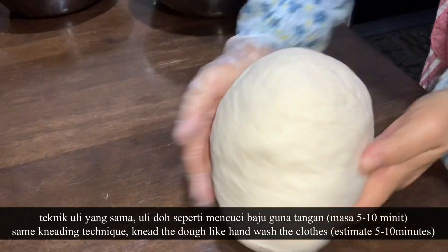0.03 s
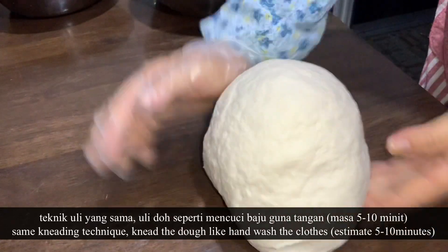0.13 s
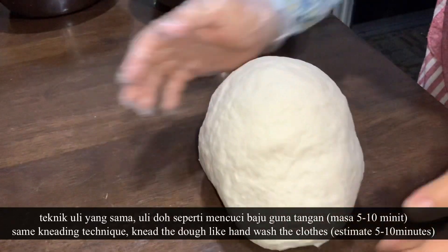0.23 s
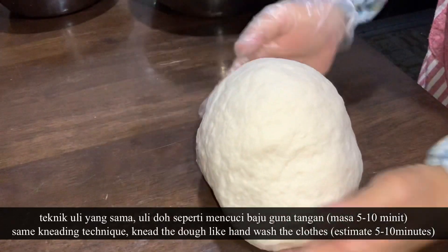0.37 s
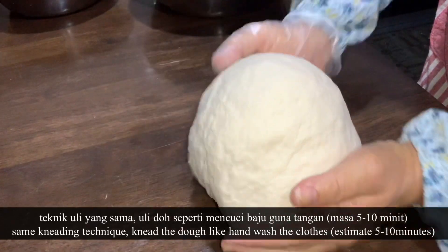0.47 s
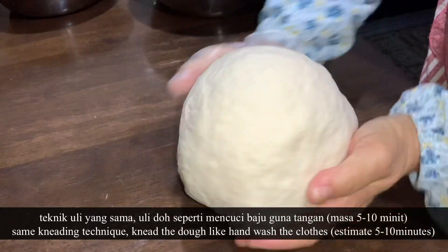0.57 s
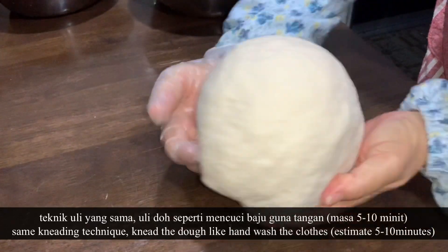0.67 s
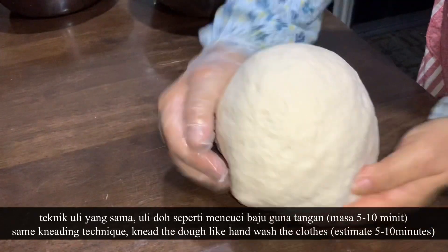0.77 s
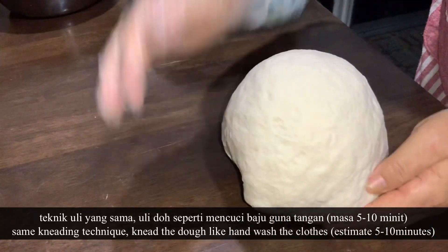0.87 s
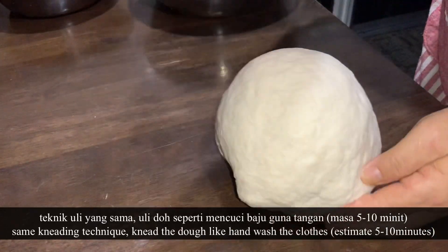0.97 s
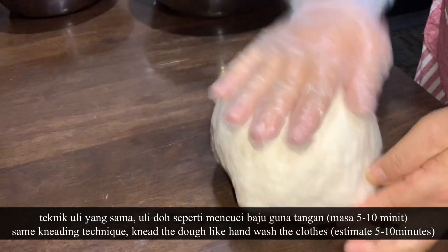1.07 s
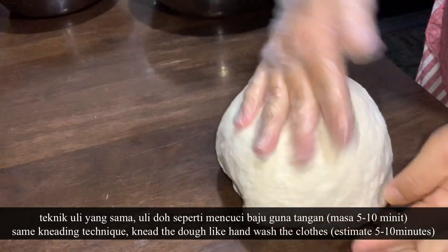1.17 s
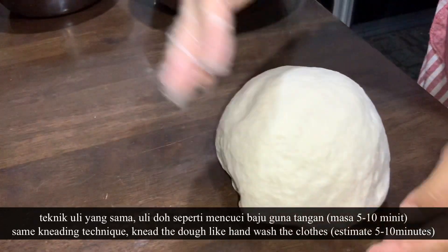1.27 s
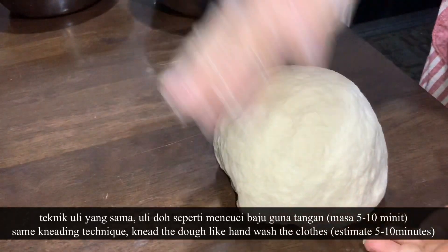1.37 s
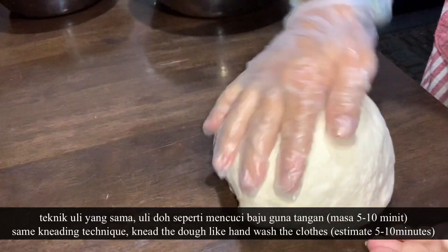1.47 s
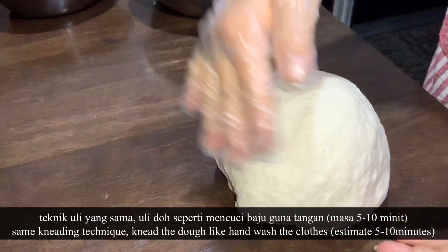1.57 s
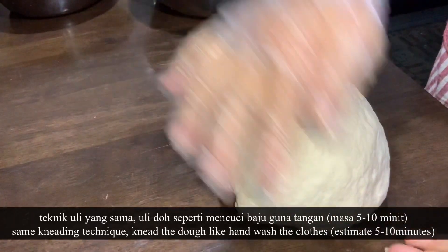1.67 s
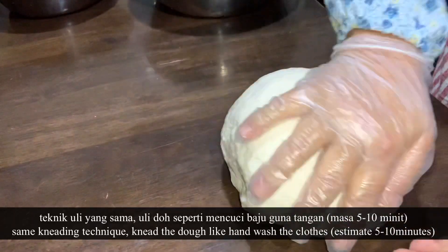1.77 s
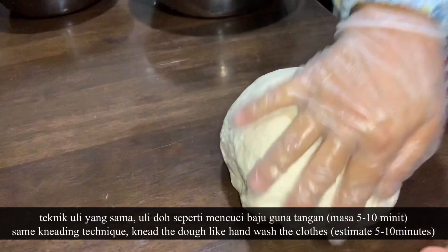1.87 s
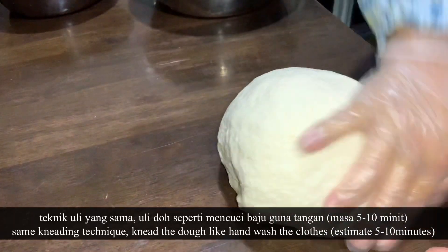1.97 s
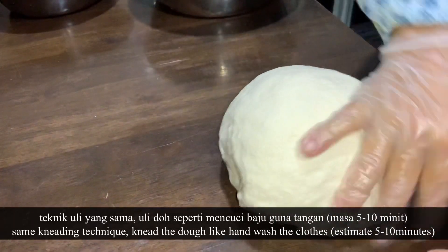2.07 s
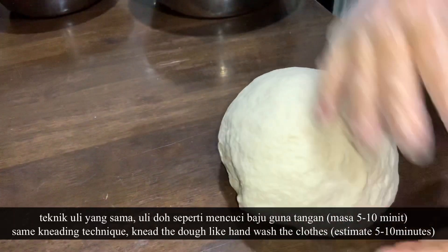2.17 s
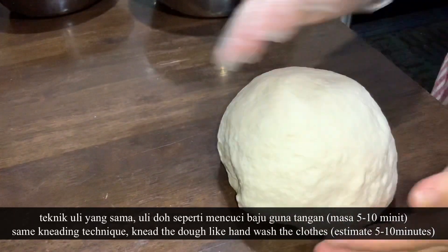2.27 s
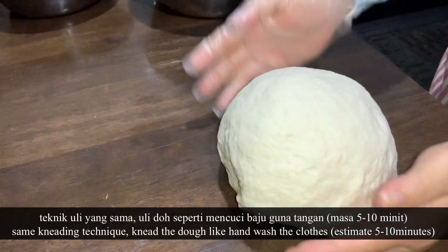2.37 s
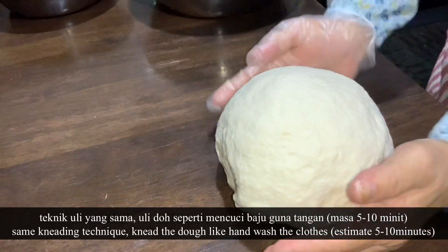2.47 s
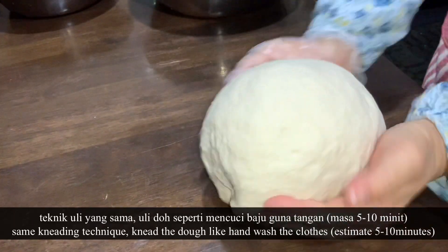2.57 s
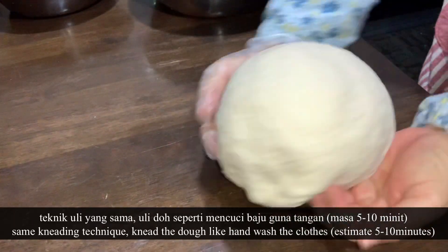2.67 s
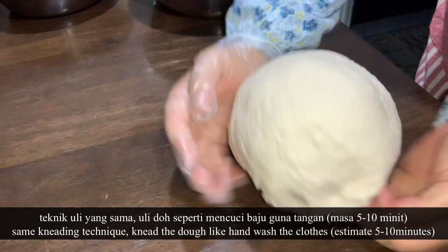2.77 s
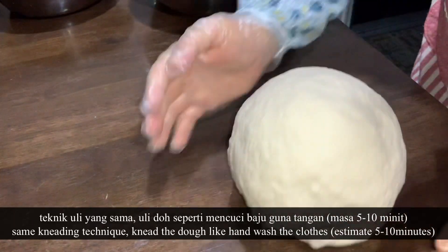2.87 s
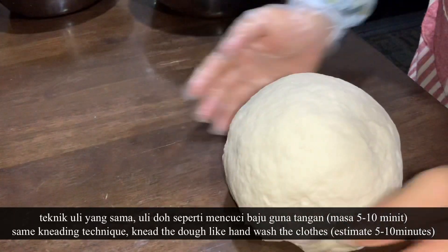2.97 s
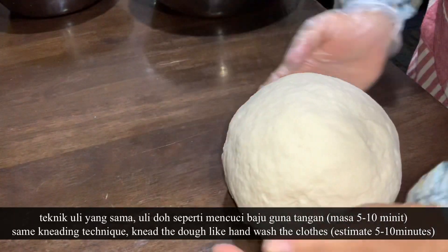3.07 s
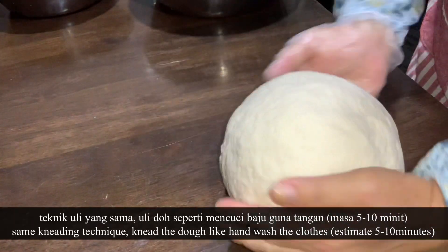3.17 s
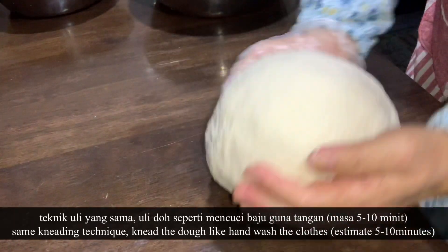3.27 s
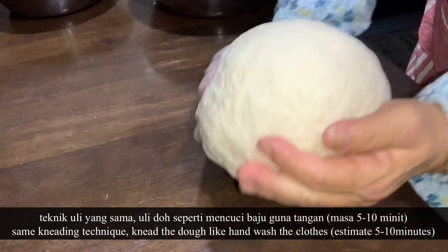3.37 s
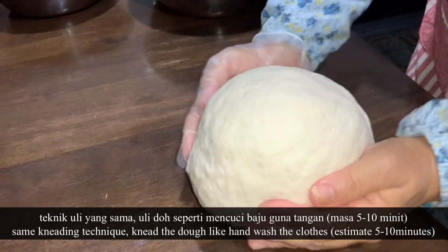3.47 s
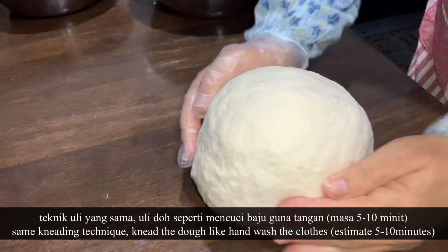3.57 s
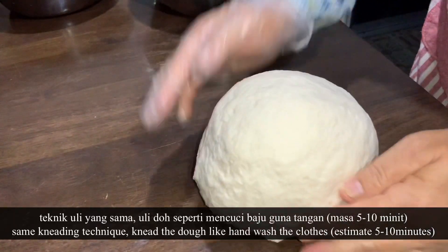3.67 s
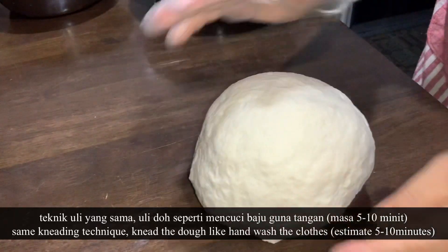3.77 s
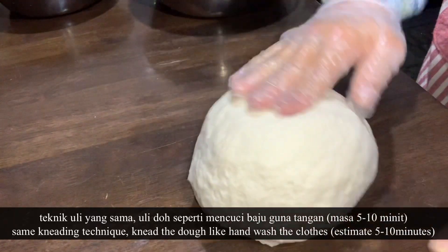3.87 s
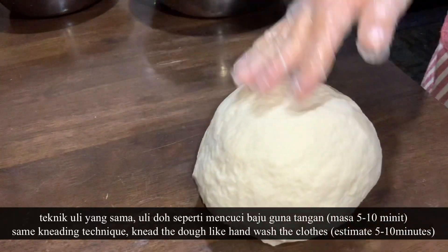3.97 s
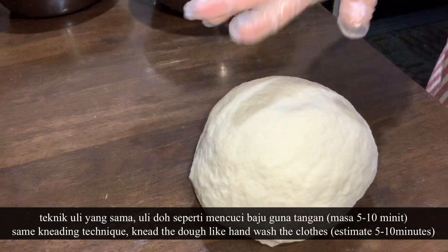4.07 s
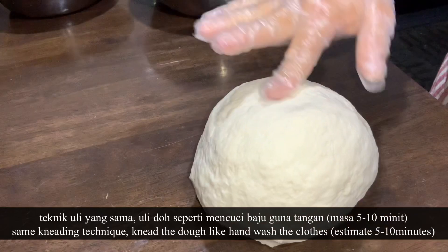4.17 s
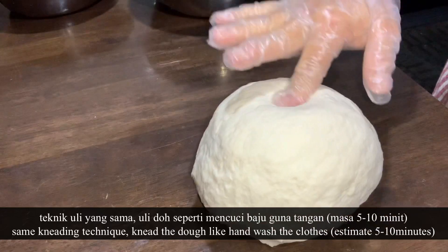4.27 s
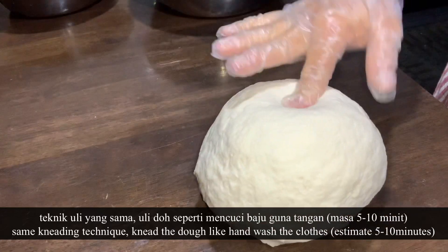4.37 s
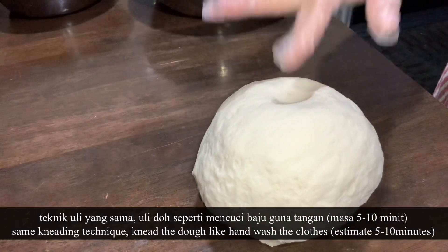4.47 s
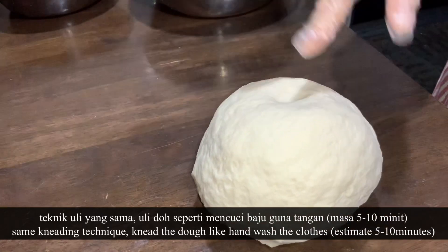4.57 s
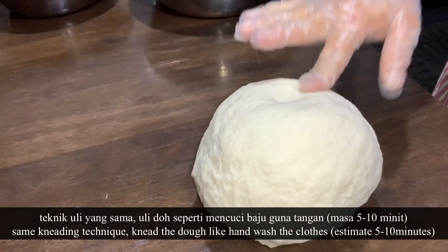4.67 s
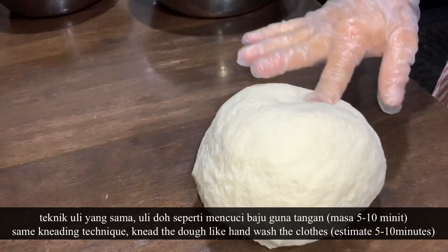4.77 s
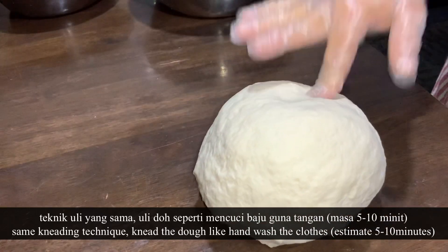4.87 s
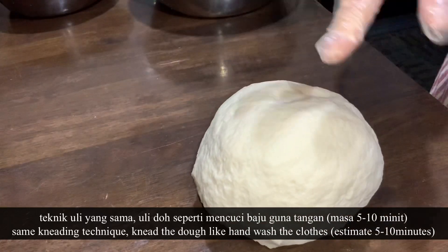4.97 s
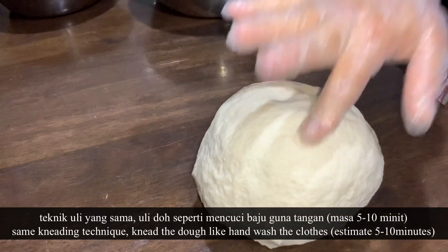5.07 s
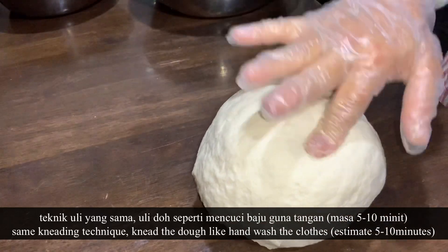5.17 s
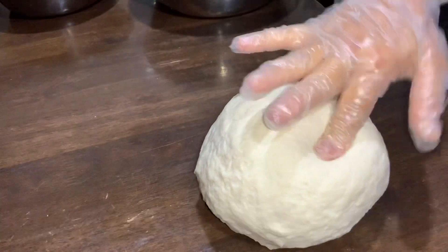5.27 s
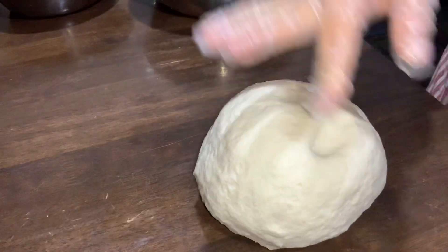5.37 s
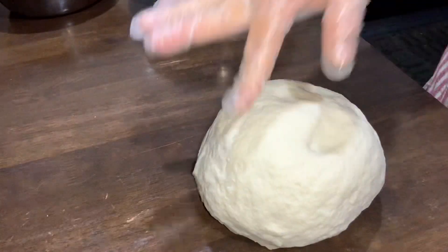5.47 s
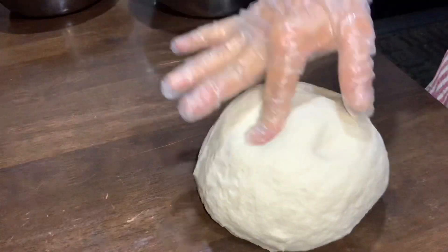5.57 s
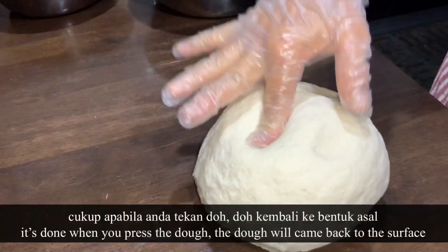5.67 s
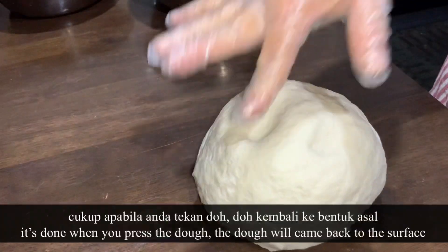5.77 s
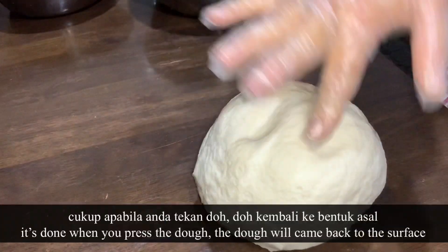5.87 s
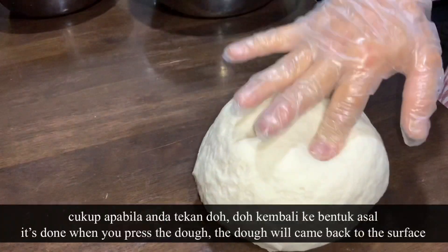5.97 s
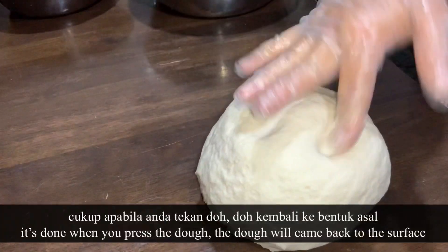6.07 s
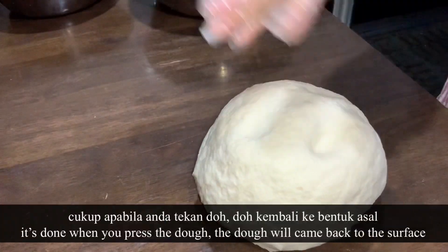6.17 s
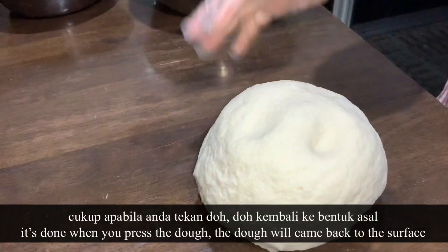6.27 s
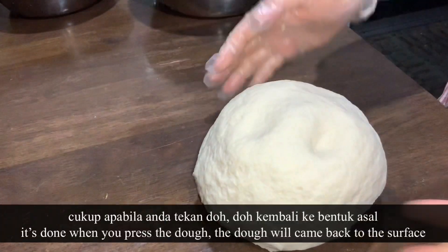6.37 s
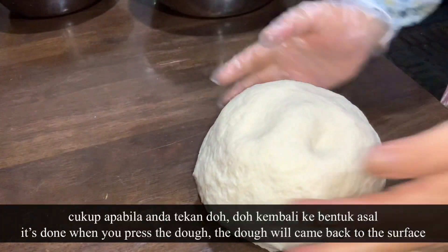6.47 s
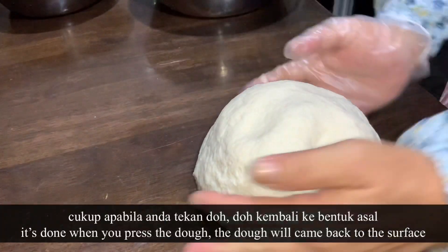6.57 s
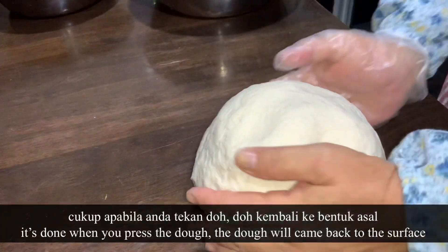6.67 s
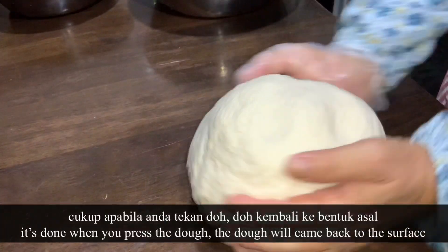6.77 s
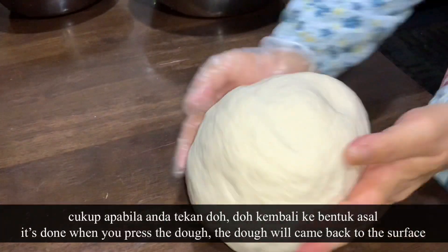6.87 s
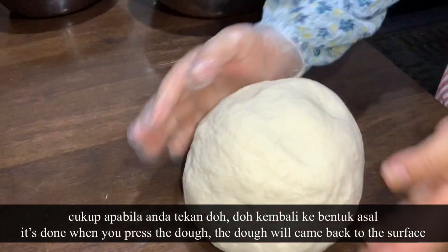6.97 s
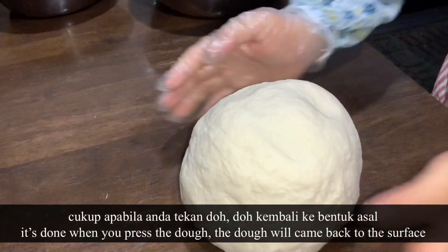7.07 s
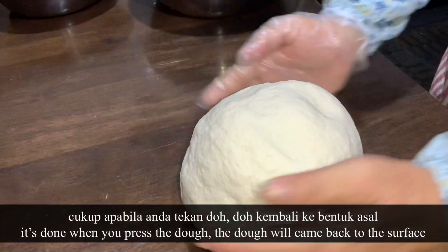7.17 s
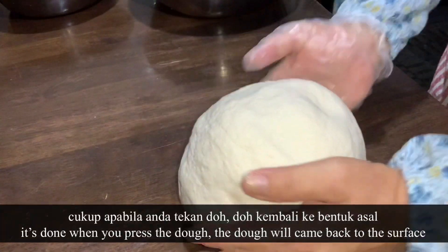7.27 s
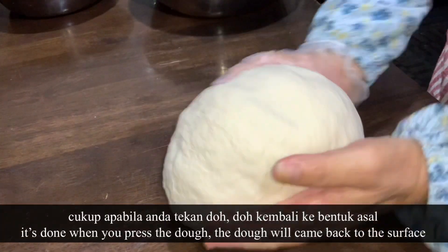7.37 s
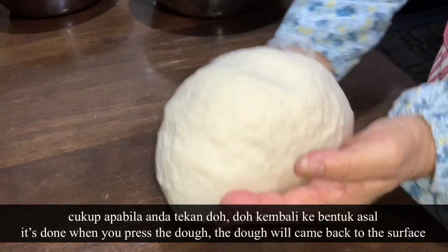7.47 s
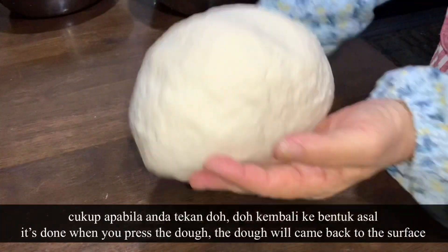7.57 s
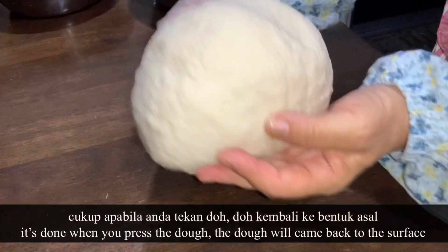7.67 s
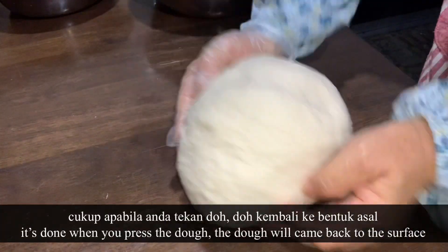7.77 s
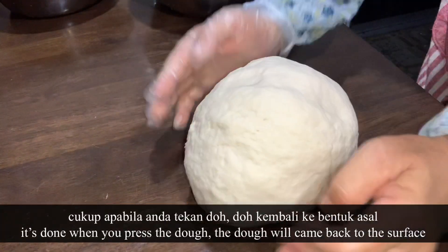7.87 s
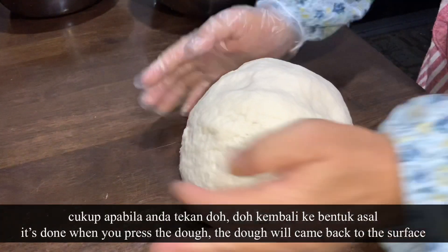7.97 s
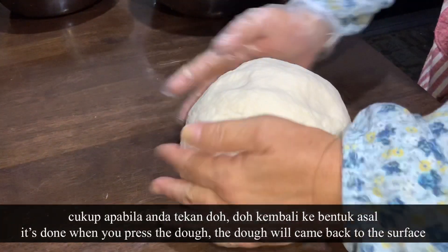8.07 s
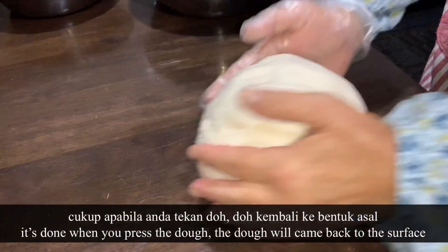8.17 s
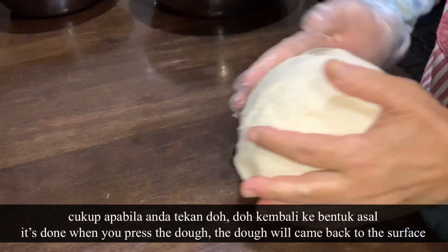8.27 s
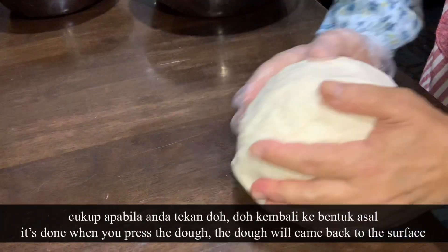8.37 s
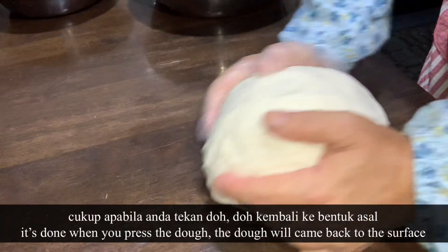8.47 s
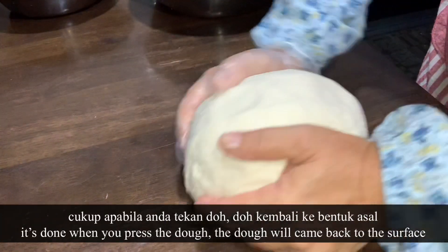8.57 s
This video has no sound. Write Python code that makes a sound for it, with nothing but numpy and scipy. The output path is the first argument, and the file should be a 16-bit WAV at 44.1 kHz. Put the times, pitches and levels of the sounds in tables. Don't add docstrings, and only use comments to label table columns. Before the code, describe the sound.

A plastic-gloved hand crinkles and turns dough, slaps it hard several times, then pokes it softly on a wooden table over low appliance rumble.

```python
import sys
import numpy as np
from scipy import signal
from scipy.fft import rfft, irfft, next_fast_len
from scipy.io import wavfile
from scipy.ndimage import uniform_filter1d, map_coordinates

SR = 44100
rng = np.random.default_rng(int(sys.argv[2]) if len(sys.argv) > 2 else 0)


def dump_mix(stems):
    frames = np.atleast_2d(stems).T
    limited = np.clip(frames, -1, 1)
    pcm = np.round(limited * 32767).astype(np.int16)
    wavfile.write(sys.argv[1], SR, pcm)


def linear_from_db(decibels):
    return 10 ** (np.asarray(decibels, float) / 20)


N = 380141


def unit(x):
    return x / np.sqrt(np.mean(x ** 2) + 1e-20)


def along(points, hz):
    f, v = np.transpose(points)
    return np.interp(np.log(hz + 1), np.log(f + 1), v)


def wobble(rate):
    knots = rng.standard_normal(int(N * rate / SR) + 4)
    return map_coordinates(knots, [np.arange(N) * rate / SR])


def filtered(x, response):
    m = next_fast_len(N + SR // 2)
    hz = np.fft.rfftfreq(m, 1 / SR)
    return irfft(rfft(x, m) * response(hz), m)[..., :N]


def shaped(x, spectrum):
    return filtered(x, lambda hz: linear_from_db(along(spectrum, hz)))


def hushed(spectrum):
    return unit(shaped(rng.standard_normal((2, N)), spectrum))


def resonant(x, hz, q):
    return signal.lfilter(*signal.iirpeak(hz, q, SR), x)


def add(track, s, sound):
    track[:, round(s * SR):][:, :sound.shape[1]] += sound


def burst(db, t60, rise_s, hold_s, size=SR // 16):
    t = np.arange(size) / SR
    decay = linear_from_db(db - 60 * np.maximum(t - hold_s, 0) / t60)
    shape = decay * (1 - np.exp(-t / rise_s)) ** 2
    puff = shape * rng.standard_normal((2, size))
    return puff * np.linalg.norm(shape) / np.linalg.norm(puff, axis=1, keepdims=True)


# frequency in Hz, level in dB per Hz.
RUMBLE_SPECTRUM = [(12, -46.5), (20, -4), (65, -7), (98, 0.5), (124, 1.5), (178, -7), (242, -5.5),
                   (347, -13), (431, -14), (608, -17.5), (905, -20), (1500, -36.5), (1950, -65),
                   (3300, -120)]
# frequency in Hz, level in dB per Hz.
AIR_SPECTRUM = [(590, -30.5), (1000, -2.5), (2830, -16.5), (4330, -13), (6650, -16.5), (10500, -16.5),
                (14400, -10), (15800, -34.5)]
# frequency in Hz, level in dB per Hz.
HALO_SPECTRUM = [(1300, -60), (1600, -8), (1800, 0), (2050, -6), (2400, -60), (5100, -60), (5170, 4),
                 (5190, 4), (5260, -60)]
# time in seconds, level in dB.
WHINE_LEVEL = [
    (7.3, -95),
    (7.5, -70),
    (7.9, -65.5),
    (8.62, -66),
]


def background():
    rumble = linear_from_db(-48.5 + 0.63 * wobble(2.1)) * hushed(RUMBLE_SPECTRUM)
    air = linear_from_db(-64.0) * hushed(AIR_SPECTRUM)
    halo = linear_from_db(5) * hushed(HALO_SPECTRUM)
    pitch_hz = 1752 + 3 * wobble(5.5)
    line = linear_from_db(2 * wobble(8)) * np.sin(2 * np.pi * np.cumsum(pitch_hz) / SR)
    whine_db = np.interp(np.arange(N) / SR, *np.transpose(WHINE_LEVEL))
    return rumble + air + linear_from_db(whine_db) * (halo + line)


def crinkle(spectrum, per_s, spread_db, grain_db, flutter_db):
    happens = rng.random(N) < per_s / SR
    sizes = happens * linear_from_db(spread_db * np.minimum(rng.exponential(size=N), 2.5))
    snaps = unit(signal.lfilter([1], [1, -np.exp(-1 / (0.0029 * SR))], sizes))
    flutter = linear_from_db(flutter_db * (wobble(25) + wobble(70)))
    shape = (1 + linear_from_db(grain_db) * snaps) * flutter
    return unit(shaped(shape * rng.standard_normal((2, N)), spectrum))


def strokes(rows, fade):
    t = np.arange(0, N / SR, .002)
    s, swell, hold, db = np.transpose(rows)[:, :, None]
    climb_db = 20 * np.maximum(s - t, 0) / swell
    fade_db = fade * np.maximum(t - s - hold, 0)
    gain = np.linalg.norm(linear_from_db(db - climb_db - fade_db), axis=0)
    return np.interp(np.arange(N) / SR, t, gain)


def patchy(x, depth_db):
    z = signal.stft(x, nperseg=512)[2]
    luck = rng.standard_normal(z.shape[1:])
    field = uniform_filter1d(uniform_filter1d(luck, size=10, axis=0), size=6, axis=1)
    return signal.istft(z * linear_from_db(depth_db * unit(field)), nperseg=512)[1][:, :N]


# full strength in seconds, swell in seconds, hold in seconds,
# level in dB.
SLIDES = [(.1, 0.084, 0.027, -30), (.21, .01, 0.065, -44.5), (.34, 0.011, 0.17, -42.5),
          (.62, 0.061, 0.087, -42.5), (.71, 0.095, .04, -40.5), (.78, 0.058, 0.0038, -26.5),
          (.83, 0.018, 0.05, -38.5), (.95, .06, 0.2, -47.5), (1.09, .01, 0.15, -37),
          (1.5, 0.13, 0.058, -35), (1.88, 0.18, 0.015, -33.5), (2.02, .02, 0.13, -42.5),
          (2.37, 0.18, .01, -48), (2.43, 0.036, 0.36, -37.5), (2.492, 0.011, 0.028, -31.5),
          (2.928, .008, 0.18, -44), (3.17, 0.28, 0.081, -38), (3.45, 0.13, 0.04, -38.5),
          (3.63, 0.055, 0.017, -38.5), (3.945, 0.18, 0.026, -41), (6.15, .06, 0.11, -62),
          (6.48, 0.037, 0.2, -44.5), (6.72, 0.067, 0.13, -37), (6.95, 0.093, 0.032, -32),
          (7.108, 0.0088, 0.35, -40.5), (7.152, 0.016, 0.021, -38), (7.302, .006, .04, -41),
          (7.68, .08, .03, -55.5), (2.7, .03, .02, -36), (3.02, 0.053, .03, -43.5),
          (3.37, .006, 0.024, -38.5), (3.515, .006, .04, -41.5), (5.75, .012, .012, -41),
          (8.012, .01, 0.0086, -37.5), (7.76, 0.075, 0.071, -39), (7.995, 0.012, 0.18, -42.5),
          (8.45, 0.17, .2, -51.5)]
# full strength in seconds, swell in seconds,
# hold in seconds, crease level in dB, drag over crease in dB.
RUBS = [(0.048, 0.12, 0.081, -38.5, -2), (0.336, 0.017, 0.023, -36.5, -9), (0.64, 0.35, 0.11, -43, -5),
        (0.776, 0.036, 0.006, -30, -16), (2.492, .008, 0.029, -34.5, -6), (2.43, .015, 0.055, -45.5, -11),
        (2.62, 0.054, 0.14, -43.5, -3), (2.752, .008, 0.0064, -41.5, -5), (2.8, .006, 0.02, -34, -2),
        (3.157, 0.12, 0.12, -42.5, -2.5), (4.756, 0.005, 0.043, -62.5, 4), (1.2, 0.028, .17, -52.5, -8),
        (7.5, .03, .2, -58, -4), (1.9, .01, .06, -43, -10), (4.83, 0.034, 0.023, -75, -3.5),
        (6.136, 0.046, 0.097, -48.5, -8.5), (6.36, 0.019, 0.078, -56.5, -5.5),
        (6.657, 0.176, 0.021, -40.5, 1.5), (6.78, 0.19, 0.17, -44.5, -8.5),
        (6.944, 0.061, 0.015, -32.5, -12), (7.23, 0.041, 0.054, -40, -1), (7.305, 0.017, 0.019, -47, 10),
        (7.36, .02, 0.054, -47, 5), (7.778, 0.066, 0.011, -33, 1), (8.106, 0.0052, 0.032, -41, -8),
        (8.18, .006, 0.013, -47.5, 7), (8.61, 0.37, .05, -44.5, -3.5)]
# full strength in seconds, hold in seconds, crease
# level in dB, drag over crease in dB.
SETTLES = [
    (1.075, 0.065, -32.5, -11),
    (1.418, 0.11, -32, -10.5),
    (1.75, 0.14, -36.5, -0.5),
    (1.993, 0.017, -30, 2),
    (3.433, 0.11, -36, -1),
    (3.87, 0.064, -42.5, -29),
]
# time in seconds,
# tick level in dB, hiss level in dB, swell in seconds, hold in seconds.
POKES = [(4.044, -31, -54, 0.067, 0.069), (4.167, -27.5, -53, 0.025, 0.0047),
         (4.435, -15.5, -42.5, 0.031, 0.0058), (4.657, -44.5, -67, 0.016, 0.0077),
         (4.855, -32, -51.5, 0.023, 0.044), (5.087, -23, -55.5, 0.011, 0.021),
         (5.331, -21, -43.5, 0.033, 0.0087), (5.5174, -25, -51, 0.0087, 0.0098),
         (5.583, -58, -61, 0.055, 0.15), (5.742, -29, -43, 0.022, 0.011),
         (5.895, -21.5, -42.5, 0.0079, 0.0064), (6.0726, -13.5, -45, 0.032, 0.0063)]
# time in seconds, crack level in dB,
# crease pitch in Hz, tick level in dB, time to fall 60 dB in seconds.
SLAPS = [
    (1.0697, -1.5, 5500, 1.5, 0.017),
    (1.4045, 1, 3650, 5, 0.013),
    (1.7129, -2.5, 3220, 3, 0.022),
    (1.9768, -9, 2220, -1, 0.025),
    (3.4317, -14, 2000, -16.5, 0.012),
    (3.8494, -12.5, 4760, -3.5, 0.0096),
    (7.767, -19, 1334, -16, 0.016),
]
# frequency in Hz, level in dB per Hz.
HISS_SPECTRUM = [(4000, -8.5), (7000, -4), (9000, -0.5), (12000, 4.5), (15500, 2.5)]
# frequency in Hz, level in dB per Hz.
CREASE_SPECTRUM = [(700, -12.5), (1500, -4), (2200, -2), (4000, -4.5), (6000, -5), (9000, -22.5),
                   (15000, -6)]
# frequency in Hz, level in dB per Hz.
DRAG_SPECTRUM = [(120, -13.5), (350, -2), (800, -2.5), (1200, -5.5), (2500, -14)]


def rustle():
    poke = strokes([(s, swell, hold, db) for s, _, db, swell, hold in POKES], fade=400)
    lead_ins = [(s, 0.0074, 0, tick_db - 33) for s, _, _, tick_db, _ in SLAPS]
    rubs = RUBS + [(s, 0.031, *rest) for s, *rest in SETTLES]
    pulls = [(s, swell, hold, db + drag_db) for s, swell, hold, db, drag_db in rubs]

    slide = strokes(SLIDES + lead_ins, fade=660) + poke
    rub = strokes([row[:-1] for row in rubs], fade=221) + linear_from_db(-1.5) * poke
    pull = strokes(pulls, fade=132) + linear_from_db(-12) * poke

    hiss = crinkle(HISS_SPECTRUM, per_s=300, spread_db=3.5, grain_db=-8, flutter_db=.7)
    crease = crinkle(CREASE_SPECTRUM, per_s=200, spread_db=4, grain_db=-4, flutter_db=.9)
    drag = crinkle(DRAG_SPECTRUM, per_s=120, spread_db=4, grain_db=-5, flutter_db=1.5)
    film = linear_from_db(3.0) * slide * hiss + linear_from_db(-0.5) * rub * crease + pull * drag
    return patchy(film, depth_db=3.0)


def ring(modes, t, rise_s, detune, centre_hz=None):
    hz, t60, db = np.transpose(modes)[:, :, None]
    if centre_hz:
        db = db - 9 * np.abs(np.log2(hz / centre_hz))
    level_luck, phase_luck, pitch_luck = rng.standard_normal((3, 2, len(modes), 1))
    start = phase_luck * np.array([.6, 9])[:, None, None]
    phase = 2 * np.pi * hz * (1 + detune * pitch_luck) * t + start
    level = linear_from_db(db + 2 * level_luck - 60 * t / t60)
    return (level * np.sin(phase)).sum(axis=1) * (1 - np.exp(-t / rise_s))


# time in seconds, smack level in dB, body level in dB,
# boom level in dB, smack pitch in Hz.
THUDS = [
    (1.069, -12, -12.5, -40, 510),
    (1.403, -10, -13.5, -24.5, 476),
    (1.72, -11, -15.5, -29, 394),
    (1.979, -10, -19.5, -22.5, 730),
    (3.431, -16.5, -17.5, -27.5, 1000),
    (3.851, -26.5, -26, -49, 712),
    (7.768, -17.5, -22, -25, 830),
]
# time in seconds, smack level in dB, boom level in dB,
# smack pitch in Hz.
PATS = [(0.13, -52, -41, 595), (0.381, -53, -60, 401), (0.544, -30.5, -46, 810), (.556, -33, -50, 740),
        (.639, -32, -46, 840), (0.764, -28, -50, 900), (.777, -34, -48, 810), (1.794, -18, -60, 990),
        (2.237, -27.5, -55, 522), (2.492, -25, -59, 855), (2.544, -26, -51, 800), (2.794, -26.5, -62, 805),
        (3.178, -37, -39, 940), (3.583, -32, -51, 814), (4.752, -41, -53, 700), (4.767, -39.5, -62, 550),
        (6.077, -37, -65, 696), (6.644, -29, -50, 850), (6.773, -29.5, -70, 1120), (7.296, -31, -53, 480),
        (7.304, -26, -62, 1010), (7.353, -40, -60, 800), (7.326, -33, -58, 600), (8.116, -41, -45, 1020),
        (8.176, -25, -54, 1020), (8.186, -27, -57, 620), (7.318, -29, -63, 1100), (3.266, -34, -53, 925),
        (2.805, -27, -42, 560), (3.486, -33, -52, 900), (.023, -31.5, -50, 600), (.222, -32.5, -45.5, 477),
        (0.829, -36.5, -54, 692), (5.762, -36, -67, 644)]
# time in seconds, level in dB, pitch in Hz, time to fall 60
# dB in seconds.
THUMPS = [(.641, -22.5, 87, .09), (0.12, -28, 97, 0.096), (.362, -28, 92, 0.07), (8.113, -32, 110, 0.093),
          (2.7, -30.5, 160, 0.13), (3.095, -32, 120, .14), (2.8, -34.5, 110, 0.095), (1.41, -24.5, 45, .2),
          (1.725, -25.5, 45, .2), (7.45, -39, 70, .2), (2.6, -36, 55, .2), (7.2, -37, 55, .2),
          (7.9, -31, 70, 0.14), (3.432, -23, 242, 0.331), (3.853, -25.5, 235, 0.084),
          (1.073, -15, 500, 0.043), (1.077, -28.5, 210, 0.37), (1.996, -21, 230, 0.133),
          (7.772, -21.5, 331, 0.15), (1.41, -21.5, 500, 0.068), (2.652, -29.5, 130, 0.055),
          (2.2, -34, 100, 0.16), (2.25, -36, 330, 0.086)]
# time in seconds, level in dB.
KNOCKS = [
    (6.543, -21),
    (6.578, -31),
    (6.735, -23),
    (6.774, -34),
    (7.158, -38.5),
    (8.229, -38),
    (8.317, -37),
]
# pitch in Hz, time to fall 60 dB in seconds, level in dB.
SMACK_MODES = [(475, 0.01, -13.5), (532.3, 0.055, 0.5), (647, 0.024, 5.5), (810, .035, 7),
               (946.4, 0.044, 3), (1148, 0.036, 2), (1351, 0.046, 4.5)]
# pitch in Hz, time to fall 60 dB in seconds, level in dB.
BODY_MODES = [(182, 0.063, -4), (216, 0.13, -3.5), (241, 0.11, -4), (262, 0.028, -3.5), (276, 0.043, 3),
              (359, 0.043, 3.5)]
# pitch in Hz, time to fall 60 dB in seconds, level in dB.
BOOM_MODES = [(44.5, 0.38, -17), (79, 0.18, 2), (122.5, 0.2, -2)]
# pitch in Hz, time to fall 60 dB in seconds, level in dB.
BOWL_MODES = [(336, 0.066, 0.5), (522, 0.026, -12.5), (810, 0.08, -17.5)]


def thuds():
    out, t = np.zeros((2, N + SR)), np.arange(SR // 4) / SR
    pats = [(s, db, (db + boom_db) / 2 - 1, boom_db, hz) for s, db, boom_db, hz in PATS]
    for s, db, body_db, boom_db, hz in THUDS + pats:
        smack = ring(SMACK_MODES, t, rise_s=0.0025, detune=0.054, centre_hz=hz)
        body = ring(BODY_MODES, t, rise_s=0.0015, detune=0.035)
        boom = ring(BOOM_MODES, t, rise_s=0.0079, detune=0.058)
        add(out, s, linear_from_db(db - 0.5) * smack)
        add(out, s + .003, linear_from_db(body_db - 3.0) * body)
        add(out, s + 0.0042, linear_from_db(boom_db + 5) * boom)
        puff = burst(db + 2, t60=.05, rise_s=.0008, hold_s=0.0025)
        add(out, s, resonant(puff, hz, 1.3))
    for s, db, hz, t60 in THUMPS:
        level = linear_from_db(db + 3.0 - 60 * t / t60) * (1 - np.exp(-t / 0.0048))
        add(out, s, np.outer([1, .3], level * np.sin(2 * np.pi * hz * t)))
    for s, db in KNOCKS:
        add(out, s, linear_from_db(db + 11.0) * ring(BOWL_MODES, t, rise_s=0.0042, detune=0.0063))
    return out[:, :N]


def crease_crack(noise, hz):
    return linear_from_db(6.5) * resonant(noise, hz, 1.2) + linear_from_db(-1.0) * noise


# time in seconds, level in dB, crease pitch in Hz.
CRACKS = [(0.066, -18, 3340), (0.0949, -13.5, 2370), (0.196, -18.5, 6020), (0.3302, -22.5, 2510),
          (.637, -23.5, 1740), (.757, -23.5, 2144), (1.189, -18, 4380), (1.8948, -13.5, 2760),
          (2.4895, -13.5, 2400), (2.5424, -15, 1800), (2.624, -14, 1710), (4.31, -44, 4500),
          (2.794, -11, 2020), (3.1584, -20.5, 1930), (3.1779, -18, 2170), (3.358, -17.5, 6340),
          (3.5043, -18.5, 2400), (4.4383, -26, 4350), (5.3344, -23.5, 4400), (5.757, -26, 1970),
          (6.4313, -31, 3270), (6.0776, -26, 3660), (2.76, -15, 4500), (6.6406, -19.5, 1580),
          (6.773, -18.5, 2050), (6.934, -28, 3350), (7.282, -21.5, 3630), (7.303, -29.5, 1240),
          (8.111, -27.5, 2220), (8.1746, -27, 1220), (.599, -36.5, 2100), (0.7732, -13.5, 1884),
          (.777, -12, 3410), (.782, -17.5, 2146), (.821, -21.5, 3280), (2.704, -30, 5500),
          (2.749, -19.5, 3220), (2.802, -18.5, 1900), (3.069, -40, 4430), (3.11, -27, 1810),
          (3.33, -31, 1500), (3.425, -23, 3300), (3.481, -20.5, 4000), (7.235, -31, 1200),
          (7.353, -25.5, 3300), (7.377, -34, 1900), (8.126, -23, 2200), (4.657, -46, 3720),
          (5.323, -37, 3500), (5.734, -41, 3000), (2.421, -33.5, 3300), (1.559, -24.5, 5000),
          (1.205, -20.5, 4400), (2.765, -21.5, 2100), (5.922, -35.5, 2970), (5.765, -28.5, 4000),
          (7.206, -32.5, 3000), (4.752, -47, 1700), (4.794, -51, 3970), (3.64, -27, 2000)]
# time in seconds, hold in seconds, level in dB, pitch in Hz.
NOISE_BANDS = [(6.93, 0.055, -24, 3530), (1.7, 0.033, -23, 2000), (1.73, 0.021, -20.5, 2700),
               (1.42, .12, -29.5, 1900), (1.42, .12, -28, 2300), (1.42, 0.13, -24, 3600),
               (1.085, 0.051, -25, 7800), (1.997, 0.011, -17.5, 3900), (1.997, .012, -16.5, 1200),
               (1.406, .004, -3, 1550), (2.8, 0.054, -28.5, 1910), (6.9, .09, -37, 1730), (6.4, 0.09, -49, 1200),
               (8.57, .06, -35, 2240), (8.55, .08, -45, 3200), (2, 0.013, -23.5, 3100),
               (1.525, 0.022, -24.5, 2200), (4.79, 0.085, -55, 2030), (7.4, 0.107, -50.5, 3600),
               (2.7, .012, -21, 900), (4.1, .02, -23, 660)]
# time in seconds, level in dB.
TICKS = [(.0947, -10.5), (0.1008, -13), (.141, -8), (.194, 1), (0.3276, 3.5), (.7462, -8.5), (0.772, -6.5),
         (0.8294, -15), (2.425, -19.5), (2.493, -21), (2.7543, -6.5), (2.77, -16), (2.7931, -42),
         (2.927, -22), (3.3575, -1), (3.5052, 6.5), (4.4112, -23), (4.888, -29), (6.9276, -31.5),
         (6.969, -6.5), (7.105, -30), (7.6806, -24.5), (7.6569, -32), (7.7406, -25), (7.3013, -22),
         (7.377, -20), (7.7099, -24), (7.9898, -26), (8.009, -18), (8.392, -24.5), (3.973, -15.5),
         (3.69, -24), (8.443, -31), (8.575, -25), (3.373, -24.5), (3.3285, -24.5), (4.1397, -30.5),
         (4.8414, -33.5), (5.1233, -35.5), (5.1477, -39), (5.323, -18), (5.3126, -28), (5.341, -23.5),
         (5.4052, -32.5), (5.4837, -39), (5.673, -37), (5.6995, -31), (5.7343, -15.5), (5.756, -16.5),
         (5.764, -20), (5.9435, -36), (5.9822, -36), (0.7762, -6), (0.7794, -5.5), (4.44, -19),
         (6.956, -19), (6.989, -21.5), (3.64, -25), (0.6961, -23.5), (5.901, -31.5), (6.079, -20.5)]
# frequency in Hz, level in dB per Hz.
TICK_SPECTRUM = [(3000, -37), (5300, -17.5), (6500, -7), (10500, -6.5), (12200, -3.5), (13100, 2.5),
                 (14100, -3), (15500, -7.5)]


def cracks():
    low, top = np.zeros((2, N + SR)), np.zeros((2, N + SR))
    for s, db, hz, tick_db, t60 in SLAPS:
        rise_s, hold_s = 0.12 * t60, 0.3 * t60
        start = s - .0015
        add(low, start, crease_crack(burst(db, t60, rise_s, hold_s + 0.0018), hz))
        add(top, start + .0008, burst(tick_db + 1.5, t60, rise_s, hold_s + 0.0007))
    poke_cracks = [(s, tick_db - 9, 4600) for s, tick_db, *_ in POKES]
    for s, db, hz in CRACKS + poke_cracks:
        add(low, s, crease_crack(burst(db, t60=0.015, rise_s=0.00058, hold_s=0.00054), hz))
    for s, hold, db, hz in NOISE_BANDS:
        band = burst(db + 7.5, t60=0.068, rise_s=0.0036, hold_s=hold, size=SR // 5)
        add(low, s, resonant(band, hz, 5.6))
    for s, db, *_ in TICKS + POKES:
        add(top, s, burst(db + 1.0, t60=0.0064, rise_s=.0004, hold_s=0.00049))
    return shaped(low[:, :N], CREASE_SPECTRUM) + shaped(top[:, :N], TICK_SPECTRUM)


# frequency in Hz, time to fall 60 dB in seconds.
KITCHEN_DECAY = [(100, 0.5), (1000, 0.52), (3000, 0.58), (8000, 0.43), (15000, 0.11)]


def kitchen(x):
    grid = dict(fs=SR, nperseg=512, noverlap=384)
    delayed = np.pad(x, ((0, 0), (300, 0)))
    hz, t, z = signal.stft(delayed, **grid)
    power = uniform_filter1d(np.mean(np.abs(z) ** 2, axis=0), size=5, axis=0)
    keep = linear_from_db(-120 * t[1] / along(KITCHEN_DECAY, hz))
    field = np.array([signal.lfilter([1 - k], [1, -k], p) for k, p in zip(keep, power)])
    fresh = signal.stft(rng.standard_normal((2, N + 300)), **grid)[2]
    noise = unit(np.abs(fresh)) * np.exp(1j * np.angle(fresh))
    return signal.istft(noise * np.sqrt(np.abs(field)), **grid)[1][:, :N]


def scene():
    sharp, soft, film = cracks(), thuds(), rustle()
    direct = (sharp + soft) * linear_from_db([[.5], [-6]])
    echo = kitchen(linear_from_db(-11.5) * sharp + linear_from_db(-8.5) * soft + linear_from_db(-9.0) * film)
    return direct + echo + film + background()


def band_limit(x):
    return signal.sosfilt(signal.butter(12, 15950, fs=SR, output="sos"), x)


# frequency in Hz, likeness from 0 to 1.
ALIKE = [(60, 0.93), (300, 0.68), (700, 0.45), (1200, 0.5), (2500, 0.63), (5000, 0.36), (8000, 0.3),
         (10000, 0.9), (15000, 0.98)]
# frequency in Hz, lead in cycles.
LEAD = [(0, 0), (800, .05), (1200, .2), (1400, .55), (2650, 1.5), (3900, 2.5), (5800, 4.5), (7300, 5.5),
        (9150, 6.5), (10650, 7.5), (16850, 11.5)]
# frequency in Hz, left minus right in dB.
LEAN = [(60, 1), (110, 3.5), (200, 1), (380, 1.5), (700, 1), (1290, 2.5), (2380, -2.5), (4400, -0.5),
        (8120, 1), (15000, -0.5)]


def record(dry):
    def share(hz):
        turn = np.arccos(np.clip(along(ALIKE, hz), 0, 1)) / 2
        return np.array([np.cos(turn), np.sin(turn)])

    def port_response(hz):
        lag = np.exp(np.pi * 1j * np.outer([-1, 1], np.interp(hz, *np.transpose(LEAD))))
        balance = linear_from_db(np.outer([.5, -.5], along(LEAN, hz)))
        treble_end = np.clip((15800 - hz) / 700 + 0.7, 0, 1) ** 3
        return lag * balance * treble_end

    mid, side = filtered(dry, share)
    ports = filtered(np.array([mid + side, mid - side]), port_response)
    mix = ports / (1 + np.abs(ports / 1.3) ** 8) ** (1 / 8)
    return band_limit(mix)


dry = scene()
out = record(dry)
dump_mix(out)
```